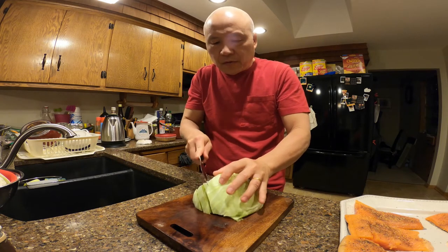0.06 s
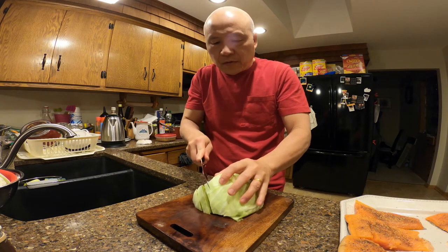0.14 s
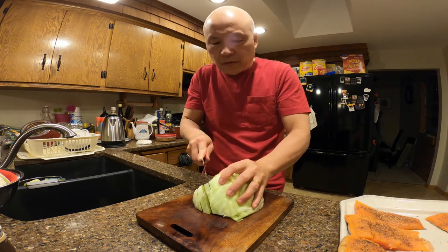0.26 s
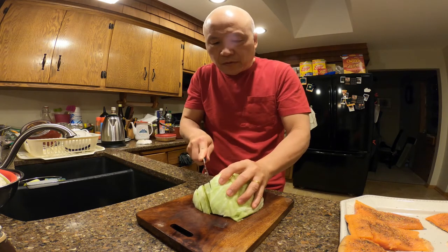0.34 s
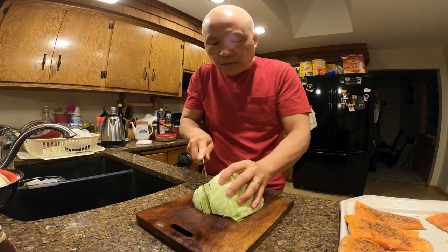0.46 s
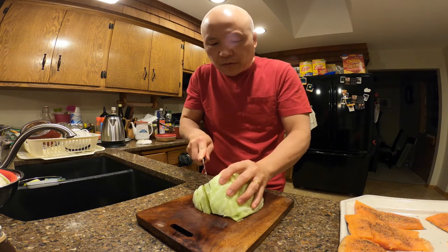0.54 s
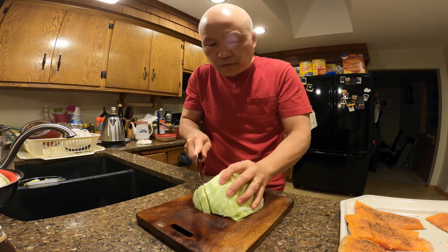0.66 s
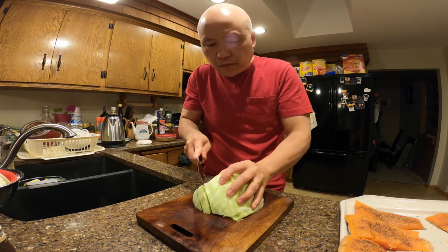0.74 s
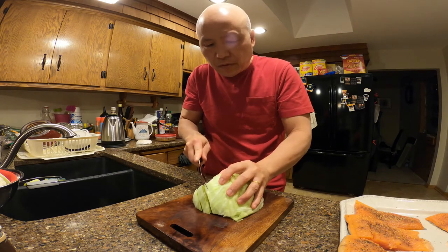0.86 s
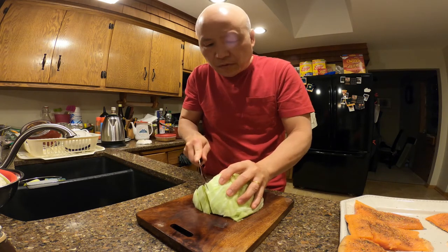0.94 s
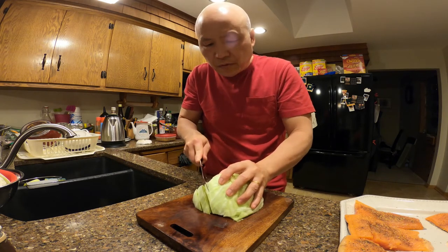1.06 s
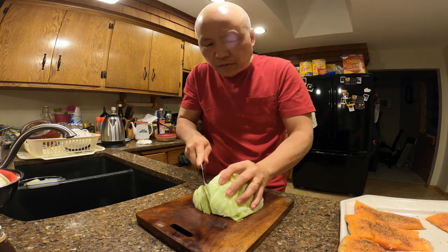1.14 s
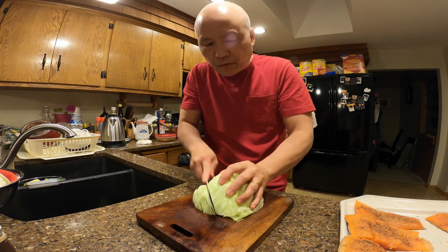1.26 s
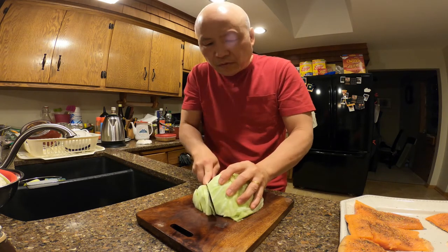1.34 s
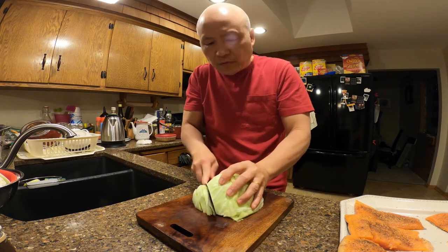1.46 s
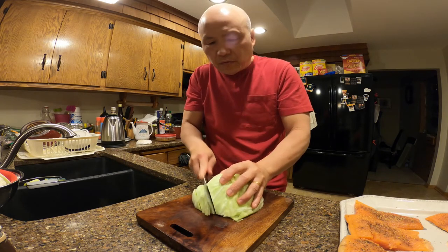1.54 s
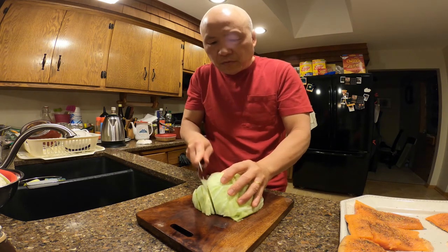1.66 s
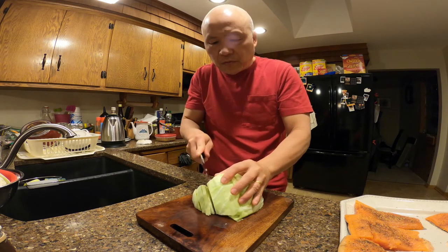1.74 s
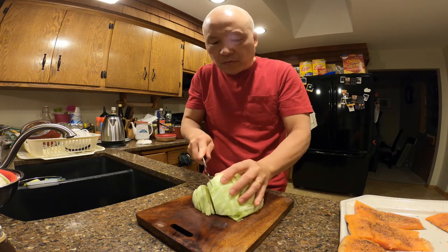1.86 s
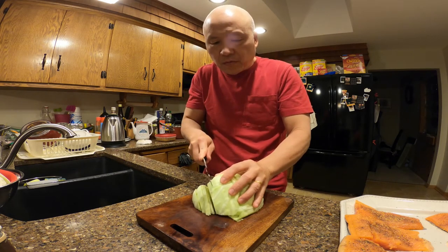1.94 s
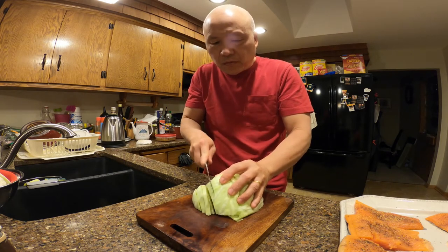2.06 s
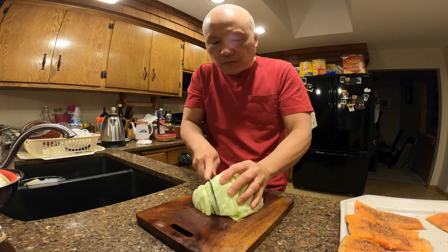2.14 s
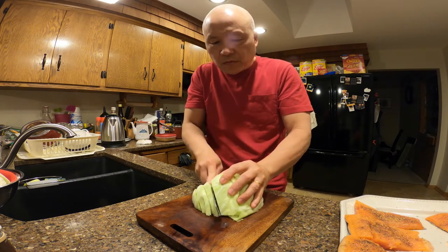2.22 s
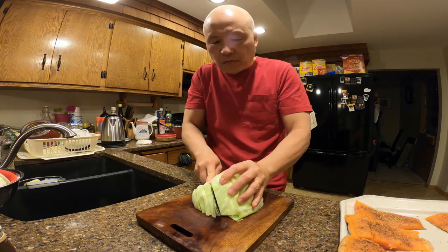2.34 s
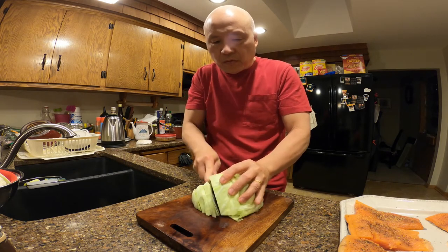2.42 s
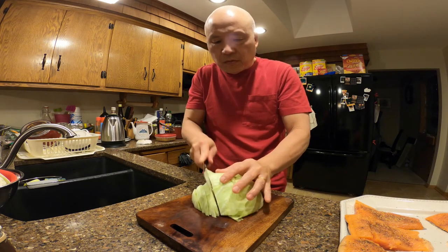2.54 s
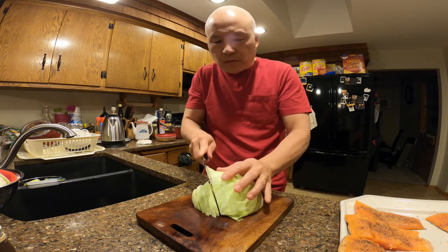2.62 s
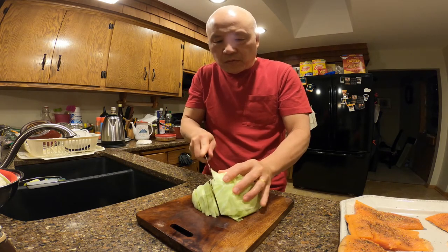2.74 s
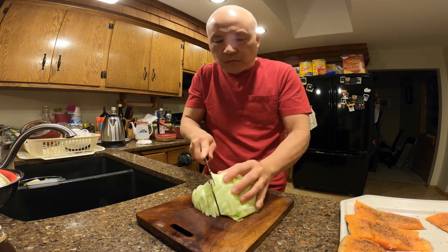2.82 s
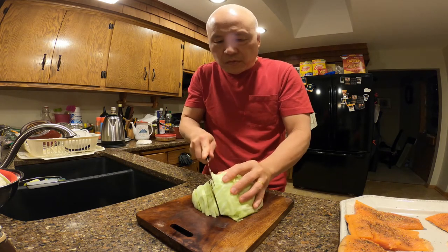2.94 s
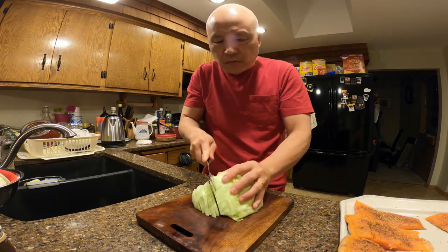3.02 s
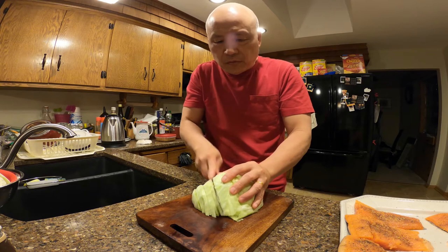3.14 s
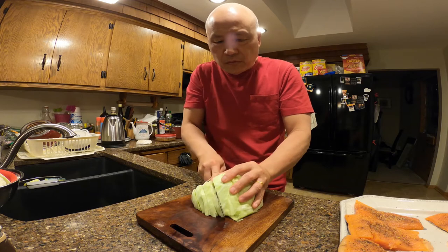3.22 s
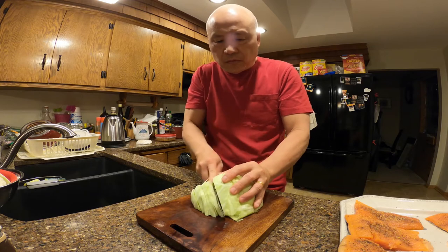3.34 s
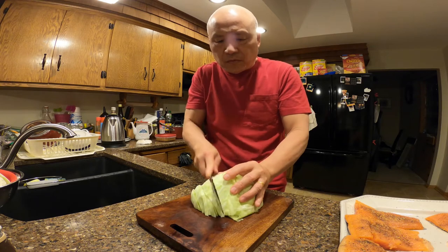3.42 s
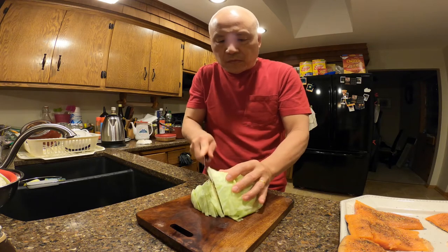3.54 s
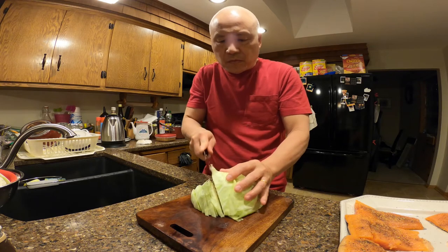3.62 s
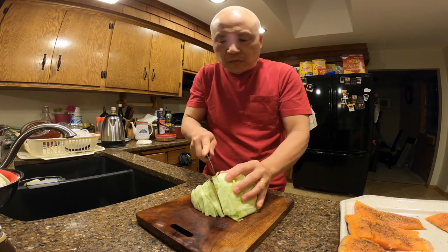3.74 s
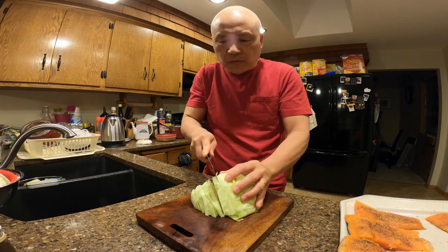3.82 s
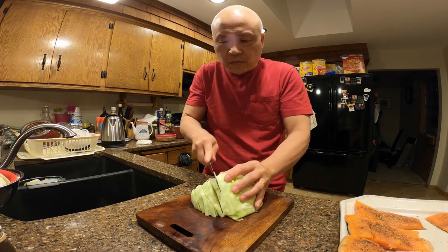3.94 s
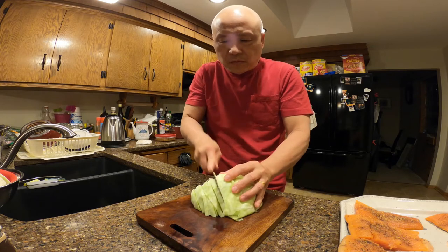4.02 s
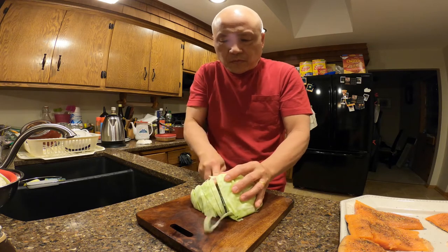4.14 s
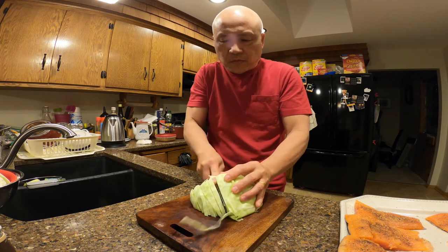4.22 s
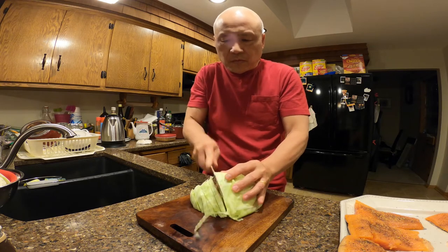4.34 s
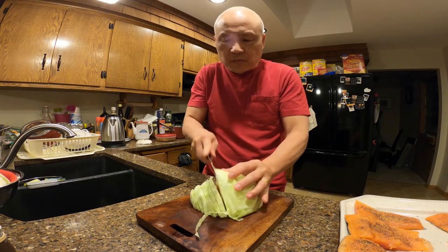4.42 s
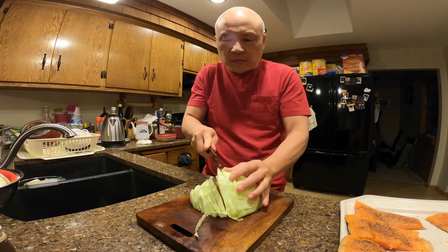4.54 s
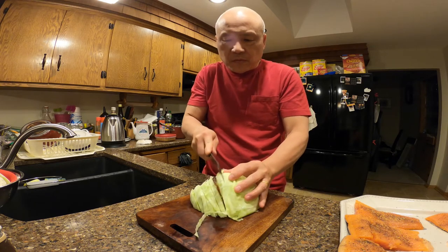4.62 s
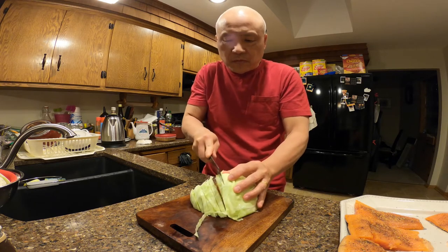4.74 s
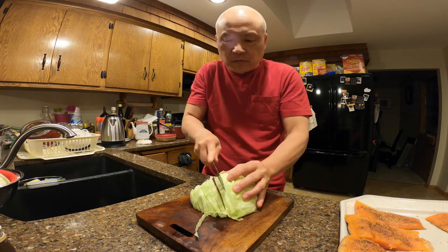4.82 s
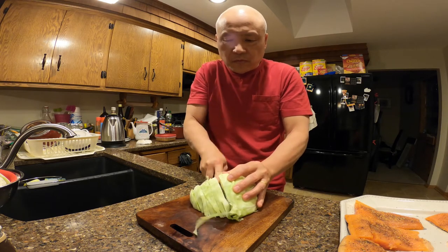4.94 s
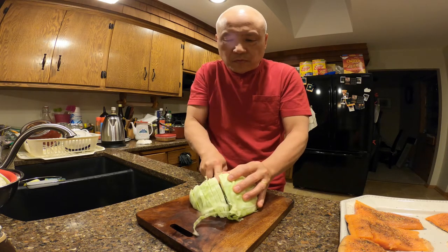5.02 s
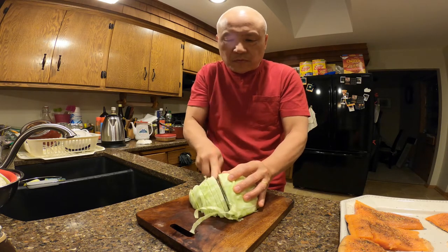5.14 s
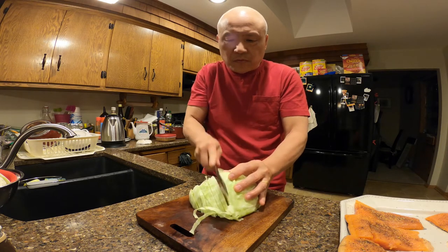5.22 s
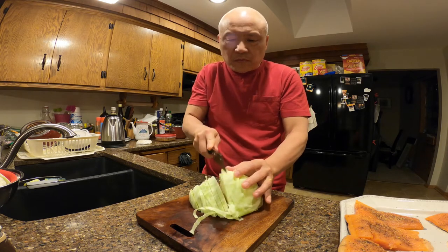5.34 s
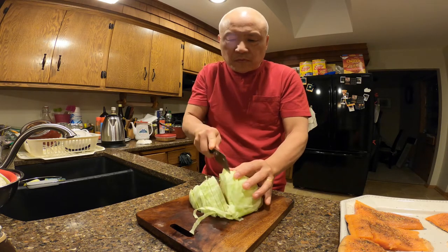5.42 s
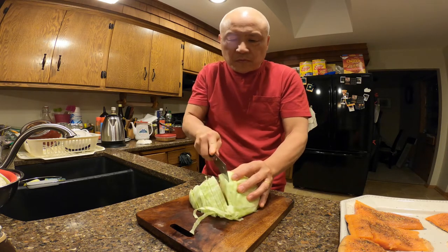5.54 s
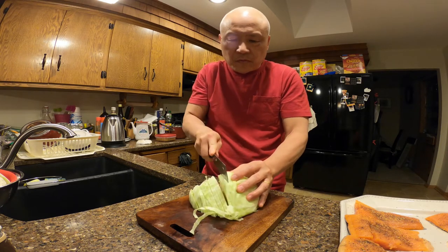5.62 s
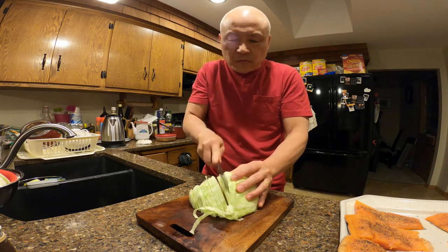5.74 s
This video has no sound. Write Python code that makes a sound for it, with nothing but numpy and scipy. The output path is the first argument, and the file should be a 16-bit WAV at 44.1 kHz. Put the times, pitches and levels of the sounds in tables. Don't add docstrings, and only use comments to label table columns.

```python
import sys
import numpy as np
from scipy import signal
from scipy.fft import rfft, irfft, next_fast_len
from scipy.io import wavfile
from scipy.ndimage import uniform_filter1d, map_coordinates

SR = 44100
rng = np.random.default_rng(int(sys.argv[2]) if len(sys.argv) > 2 else 0)


def field_ratio(decibels):
    return 10 ** (np.asarray(decibels, dtype=float) / 20)


def unload_audio(sound):
    columns = np.transpose(np.atleast_2d(sound))
    steps = np.round(np.clip(columns, -1, 1) * 32767)
    wavfile.write(sys.argv[1], SR, steps.astype(np.int16))


N = 254456


def unit(x):
    return x / np.sqrt(np.mean(x ** 2) + 1e-20)


def along(points, hz):
    f, v = np.transpose(points)
    return np.interp(np.log(hz + 1), np.log(f + 1), v)


def wobble(rate):
    knots = rng.standard_normal(int(N * rate / SR) + 4)
    return map_coordinates(knots, [np.arange(N) * rate / SR])


def filtered(x, response):
    m = 2 * next_fast_len(N // 2 + SR // 4)
    return irfft(rfft(x, m) * response(np.fft.rfftfreq(m, 1 / SR)), m)[..., :N]


def resonances(modes):
    def response(f):
        total = 0
        for k, (centre, width, db) in enumerate(modes):
            damping = 1j * f * width
            total = total + (-1) ** k * field_ratio(db) * damping / (centre * centre - f * f + damping)
        return total
    return response


def causal(spectrum):
    def response(hz):
        cepstrum = irfft(np.log(field_ratio(along(spectrum, hz)) + 1e-5))
        cepstrum[1:len(hz) - 1] *= 2
        cepstrum[len(hz):] = 0
        return np.exp(rfft(cepstrum))
    return response


def pair(two, alike):
    turn = lambda hz: np.arccos(np.clip(along(alike, hz), -1, 1)) / 2
    mid, side = filtered(two, lambda hz: np.array([np.cos(turn(hz)), np.sin(turn(hz))]))
    return np.array([mid + side, mid - side])


# frequency in Hz, density in dB per Hz.
AIR = [(20, -16), (59, -22), (100, -15), (129, -5.5), (259, -4.5), (288, -8), (420, -7.5), (520, -18),
       (810, -23), (1260, -21.5), (4030, -37), (7000, -39.5), (9000, -42.5), (11000, -44.5), (15600, -51.5)]
# frequency in Hz, left-right likeness from 0 to 1.
AIR_ALIKE = [(60, 0.27), (240, 0.1), (950, 0.11), (3770, 0.19), (15000, 0.09)]


def air():
    air_db, whine_hz, whine_db = -64.5, 9195, -94
    hiss = filtered(rng.standard_normal((2, N)), lambda hz: field_ratio(along(AIR, hz)))
    whine = field_ratio(whine_db + 1.5 * wobble(6)) * np.sin(2 * np.pi * whine_hz * np.arange(N) / SR)
    return field_ratio(air_db + 0.7 * wobble(5.3)) * unit(pair(hiss, AIR_ALIKE)) + whine


# first bite in seconds, full force in
# seconds, crunch at full force in dB, fleshy part in dB, treble in dB.
CUTS = [
    (1.23, 1.28, -35, -0.5, 0),
    (2.142, 2.203, -28, -1.5, -1.8),
    (3.118, 3.141, -34, 0.5, -0.9),
    (4.04, 4.078, -31, 1.5, -0.6),
    (4.889, 4.935, -32, 0.5, 0),
]
# push while cutting in dB, board rocking after the landing
# in dB, cabinet sway in dB.
SHAKES = [
    (-37.5, -46.5, -2.5),
    (-35.5, -32, -1.5),
    (-36.5, -30, -1),
    (-37, -26.5, 2.5),
    (-38.5, -33.5, 0.5),
]
# time in seconds, crunch in dB.
LAYER_FORCES = [
    [(1.23, -61), (1.24, -42), (1.256, -46), (1.262, -43), (1.294, -35), (1.348, -34.5), (1.36, -32),
     (1.43, -35)],
    [(2.145, -50.5), (2.159, -40), (2.171, -45), (2.181, -36), (2.209, -30), (2.341, -36), (2.345, -39.5)],
    [(3.122, -61), (3.13, -43.5), (3.144, -33.5), (3.162, -42.5), (3.194, -32), (3.202, -38),
     (3.232, -33.5), (3.324, -39), (3.33, -32.5)],
    [(4.04, -58), (4.048, -45), (4.084, -31), (4.158, -39.5), (4.196, -34), (4.218, -35), (4.222, -34)],
    [(4.895, -53), (4.919, -44.5), (4.924, -37.5), (4.939, -31.5), (4.985, -36), (4.999, -32.5),
     (5.017, -38.5), (5.039, -30.5), (5.067, -35.5), (5.074, -31)],
]
# start in seconds, length in seconds, level in dB,
# fleshy part in dB.
RUSTLES = [(0.0, 0.018, -59.5, -4.5), (0.292, .04, -77, 1), (0.545, .06, -78, -24), (.71, .03, -84, -1),
           (0.967, .04, -78, -8), (1.197, .012, -62, -11), (1.441, .05, -55.5, -3), (1.645, .03, -55, 2.5),
           (1.719, .05, -61.5, -13), (1.793, .045, -70, -1), (2.003, 0.018, -67, -8), (2.12, .01, -58, -10),
           (2.493, 0.097, -60.5, -0.5), (2.604, 0.082, -56, -3.5), (2.938, 0.016, -64, 0),
           (3.457, 0.11, -56.5, 1), (3.611, 0.1, -55.5, -2), (3.91, .02, -71, -4), (4.332, .16, -63, -2),
           (4.497, 0.1, -67.5, -3.5), (4.784, 0.006, -63, -5.5), (4.8, .01, -66, -5),
           (4.82, 0.049, -72.5, -10), (5.33, 0.04, -58.5, -2.5), (5.395, 0.049, -65, -3.5),
           (5.637, .02, -63, 3), (5.52, .02, -76, 0), (5.685, .08, -82, -1), (5.239, .07, -66.5, 0)]


def effort_curves():
    bite_flesh_db, top_flesh_db, core_flesh_db = -2, -3, -1
    parted_db_per_s = 1500.5
    rock_rise_s, rock_db_per_s = 0.028, 186.5
    rustle_rise_db_per_s, rustle_fall_db_per_s, rustle_shake_db = 3000, 284.5, -6.5
    t = np.arange(0, N + 32, 32) / SR
    crunch, flesh, shake, light, sway, top = np.full((6, len(t)), 1e-6)
    for cut, (push_db, rock_db, sway_db), layers in zip(CUTS, SHAKES, LAYER_FORCES):
        bite, full, full_db, flesh_db, top_db = cut
        land = min(blow[0] for blow in BLOWS if blow[0] > full)
        after = np.maximum(t - land, 0)
        force = field_ratio(np.interp(t, *np.transpose(layers)) + 0.5 - full_db) * (t > bite)
        sound = field_ratio(full_db) * force * field_ratio(-parted_db_per_s * after)
        depth_db = np.interp(t, [bite, full, land], [bite_flesh_db, top_flesh_db, core_flesh_db])
        crunch = crunch + sound
        flesh = flesh + sound * field_ratio(flesh_db + depth_db)
        top = top + sound * field_ratio(top_db)
        rock_fall = field_ratio(rock_db - rock_db_per_s * np.maximum(after - rock_rise_s, 0))
        moving = field_ratio(push_db) * force * (t < land) + np.minimum(after / rock_rise_s, 1) * rock_fall
        shake = shake + moving
        sway = sway + field_ratio(sway_db) * moving
    for s, length, db, flesh_db in RUSTLES:
        rise_db = -rustle_rise_db_per_s * np.maximum(s - t, 0)
        fall_db = -rustle_fall_db_per_s * np.maximum(t - s - length, 0)
        sound = field_ratio(db + rise_db + fall_db)
        crunch, top = crunch + sound, top + sound
        flesh = flesh + sound * field_ratio(flesh_db)
        light = light + sound * field_ratio(rustle_shake_db)
    shake = shake + light
    curves = (crunch, flesh, shake, sway, top)
    crunch, flesh, shake, sway, top = [np.interp(np.arange(N) / SR, t, c) for c in curves]
    sway = sway * field_ratio(-7.5 + 1.5 * wobble(14)) + field_ratio(-77 + 3 * wobble(27))
    return 20 * np.log10([crunch, flesh / crunch, shake, sway, top / crunch])


def ruptures(density, spread_db, spectrum):
    bursts = rng.random(N) < density / SR
    sizes = bursts * field_ratio(spread_db * np.clip(rng.exponential(size=N), 0, 4.5)) / np.sqrt(density)
    return unit(filtered(sizes * rng.standard_normal((2, N)), lambda hz: field_ratio(along(spectrum, hz))))


def patchy(x, depth_db):
    z = signal.stft(x, nperseg=128)[2]
    field = uniform_filter1d(rng.standard_normal(z.shape[1:]), size=4, axis=0)
    field = uniform_filter1d(field, size=3, axis=1)
    return unit(signal.istft(z * field_ratio(depth_db * unit(field)), nperseg=128)[1][:, :N])


HEAVY_HZ = 1500


def shaken(level_db, modes):
    body = lambda hz: resonances(modes)(hz) / (1 + 1j * hz / HEAVY_HZ) ** 2
    gain = np.std(filtered(rng.standard_normal(N), body))
    return filtered(field_ratio(level_db + 2.3 * wobble(30)) * rng.standard_normal(N), body) / gain


# frequency in Hz, density in dB per Hz.
CRISP = [(1180, -19.5), (2000, -15), (2540, -6), (3560, -3.5), (4520, -6.5), (7450, -10.5), (8180, -12),
         (9070, -12.5), (11900, -22.5), (14600, -31), (15600, -35)]
# frequency in Hz, density in dB per Hz.
FLESH = [(250, -28.5), (450, -14), (640, -0.5), (1150, -2), (1500, 1), (2000, -2.5), (3000, -24),
         (4500, -37.5)]
# frequency in Hz, width in Hz, level in dB.
COUNTER = [(136.1, 12, 1), (200.3, 6.5, 0), (299, 49, -13.5)]
# frequency in Hz, width in Hz, level in dB.
CABINET = [(66.74, 46, -10.5), (32, 9.5, -27)]


def cutting():
    crunch_db, flesh_db, shake_db, sway_db, top_db = effort_curves()
    effort = np.clip(field_ratio(crunch_db + 41.0), 0, 1)
    layers_db = 1.1 * wobble(45) + 1.4 * wobble(170) + 2.2 * (1 - effort) * wobble(70)
    crisp = ruptures(3000 + 9000 * effort, 0.67 + 0.8 * effort, CRISP)
    crisp = patchy(crisp, depth_db=3.0) * field_ratio(layers_db - 0.5)
    dull = filtered(crisp, lambda hz: 1 / (1 + (hz / 5000) ** 4))
    crisp = dull + (0.39 + 0.19 * effort) * field_ratio(top_db) * (crisp - dull)
    flesh = patchy(ruptures(1500 + 5000 * effort, 2.1, FLESH), depth_db=2.0)
    flesh = flesh * field_ratio(layers_db + flesh_db - 3.0)
    sway_hz = CABINET[0][0] * (1 + 0.15 * wobble(20))
    sway = field_ratio(sway_db + 3.5 + 2.4 * wobble(25)) * np.sin(2 * np.pi * np.cumsum(sway_hz) / SR)
    shake = shaken(shake_db - 0.5, COUNTER) + sway + shaken(sway_db - 10.5, CABINET)
    return field_ratio(crunch_db) * (crisp + flesh), shake


# start in seconds, peak in dB, pitch in Hz.
TICKS = [(1.565, -49, 4000), (2.5, -49.5, 4500), (2.523, -49, 5500), (2.555, -47, 4000), (2.562, -43, 5000),
         (2.577, -48, 2500), (2.668, -51, 4500), (2.677, -41, 3990), (.008, -56, 4100),
         (.0174, -42.5, 6300), (.0428, -47, 1970), (.1411, -53, 4600), (.2927, -49, 4040),
         (.3122, -53, 4050), (.3661, -65, 4470), (.5501, -49, 3500), (.5606, -41.5, 5940),
         (.605, -46, 5030), (.615, -53, 4000), (.644, -60, 4500), (.7093, -52, 5900), (.7186, -58, 5000),
         (.9343, -47, 1720), (1.0824, -56, 5000), (1.1139, -51.5, 2800), (1.66, -54, 9800),
         (1.866, -57.5, 4200), (2.138, -45.5, 4020), (2.9222, -48, 3560), (3.1104, -48, 1990),
         (3.91, -43.5, 6160), (4.365, -46, 4020), (4.465, -60, 4000), (4.518, -52.5, 4000),
         (4.617, -50, 4960), (4.8204, -54.5, 1460), (4.8808, -35.5, 5550), (4.89, -32, 2510),
         (5.318, -47.5, 2565), (5.35, -45, 4900), (5.522, -56, 2505), (5.575, -60, 9000), (.0, -56, 6000),
         (5.592, -49, 4500), (5.764, -49, 4020)]
# start in seconds, peak in dB, pitch in Hz.
TOUCHES = [(.282, -64, 5000), (.567, -50.5, 7000), (.7, -66, 7000), (.99, -51, 7980), (1.5, -43.5, 9440),
           (.9772, -50, 3012), (1.198, -43.5, 3134), (2.0073, -47, 3020), (2.1221, -43.5, 4340),
           (2.9438, -43.5, 3960), (4.0219, -32.5, 1884), (4.7837, -41.5, 3360), (5.6371, -40, 1432)]
# start in seconds, peak in dB, pitch in Hz.
PIPS = [(.722, -63, 6500), (.977, -58, 3000), (1.7255, -44, 3300), (1.7315, -42, 3500), (1.754, -51, 3100),
        (1.7655, -53, 3600), (1.798, -53, 2000), (1.82, -54, 2500), (1.8245, -45, 3800), (1.833, -53, 3200),
        (1.889, -55, 4100), (2.513, -54, 9200), (2.537, -51, 3000), (2.596, -54, 6200), (2.668, -49, 5900),
        (2.677, -50, 2000), (3.515, -50, 4700), (3.533, -51, 1500), (4.403, -56, 3000),
        (4.4785, -52, 12000), (4.5, -53, 3000), (4.842, -66, 9000), (4.891, -52, 9000),
        (4.9215, -35, 12000), (5.513, -59, 1700), (5.533, -63, 3000), (5.765, -56, 2800)]
# start in seconds, peak in dB, pitch in Hz.
SQUEAKS = [(.985, -71, 2950), (1.7245, -54.5, 3190), (1.745, -58.5, 3500), (1.77, -66.5, 3380),
           (1.795, -65.5, 3494)]
# start in seconds, peak in dB, pitch in Hz.
RIBS = [(1.2395, -29, 3604), (1.2616, -25, 3862), (1.2853, -20.5, 2740), (2.148, -33.5, 3900),
        (2.1822, -24.5, 3386), (3.1305, -30, 2640), (3.1416, -24.5, 2865), (3.1886, -30, 3423),
        (4.0478, -30.5, 1833), (4.0553, -31, 1883), (4.0817, -25, 2538), (2.1598, -35, 3950),
        (2.2117, -26, 3520), (4.9362, -21, 5835), (4.8992, -32, 3443), (4.9217, -24, 2720),
        (5.0356, -26, 2930), (1.2972, -24.5, 3430), (1.31, -22.5, 1893), (1.365, -28, 3516),
        (3.24, -29, 3483), (3.285, -30, 3207), (4.0758, -33, 3890), (4.9951, -27, 2080)]
# start in seconds, peak in dB, pitch in Hz, pitched part in dB.
SHREDS = [(4.0225, -47, 750, 8), (4.035, -46.5, 700, 8), (1.691, -52, 1485, 1), (1.6494, -40.5, 4540, -3),
          (1.654, -49.5, 920, 7.5), (1.725, -42.5, 3160, -5), (1.752, -45, 3540, -3.5),
          (1.5, -41.5, 8120, -3), (2.514, -47.5, 4760, -7.5), (2.602, -37.5, 2950, -1),
          (2.6842, -38, 4510, -6), (3.4785, -35.5, 4020, -9), (3.485, -44, 1110, 4),
          (3.5778, -37.5, 3775, -8.5), (3.5985, -41, 1320, 1), (3.638, -54, 950, -2),
          (3.6714, -50, 1138, 5.5), (3.686, -53, 1826, 13.5), (3.708, -39, 3015, -10),
          (3.813, -61, 5320, -4), (4.352, -45, 6170, -9), (4.4328, -42, 2200, 0.5),
          (4.4772, -38, 2680, -17.5), (4.487, -40, 7030, -20), (4.5269, -45, 4400, -11),
          (4.5674, -36, 3400, -14.5), (4.6099, -52, 1680, -0.5), (5.3353, -36, 1195, -23),
          (5.439, -37, 1110, -12)]
# frequency in Hz, density in dB per Hz.
RIB_CLICK = [(500, -39), (1200, -9), (3500, -10), (7500, -7.5), (8200, -6), (10000, -12.5), (13500, -17),
             (15600, -47)]


def snaps():
    # snaps, decay t60 in seconds, pitched part in dB, blur of the pitch, click top over its pitch.
    sorts = [(RIBS, 0.042, -10, 0.09, 7.3), (SHREDS, 0.016, 0, 0.11, 3), (TOUCHES, 0.053, -14, 0.12, 8.3),
             (TICKS, 0.012, -12.5, 0.2, 2.7), (SQUEAKS, 0.07, 3.9, 0.21, 1.3), (PIPS, 0.014, 1.5, 0.08, 1.8)]
    click, tone, t = np.zeros((2, N + SR)), np.zeros(N + SR), np.arange(SR // 5) / SR
    for table, t60, sort_tone_db, blur, top in sorts:
        decay = field_ratio(-60 * t / t60)
        fade = (1 - np.exp(-t / 0.00068)) * (field_ratio(-60 * t / 0.0022) + 0.56 * decay)
        for s, db, hz, *own_tone_db in table:
            at = round(s * SR)
            low_pass = signal.butter(2, min(top * hz, 20000), fs=SR)
            burst = signal.lfilter(*low_pass, fade * rng.standard_normal((2, len(t))))
            click[:, at:][:, :len(t)] += field_ratio(db + 6.5) * burst
            drift = blur * np.cumsum(rng.standard_normal(len(t)))
            tone_db = db + sort_tone_db + sum(own_tone_db)
            tone[at:][:len(t)] += field_ratio(tone_db) * decay * np.sin(2 * np.pi * hz * t + drift)
    return filtered(click[:, :N], causal(RIB_CLICK)) + tone[:N]


# start in seconds, level in dB.
THUMPS = [(.005, -63), (0.818, -59.5), (.97, -57.5), (1.081, -55), (1.66, -50.5), (2.03, -56), (2.82, -61),
          (3.66, -56), (5.299, -57), (5.46, -59.5), (2.62, -53.5), (2.954, -45.5), (3.03, -53),
          (3.617, -59), (3.924, -52.5), (4.6, -54.5), (4.795, -46.5), (5.652, -45.5), (5.701, -50)]


def thumps():
    push_s, cabinet_db = 0.0071, 10
    push, t = np.zeros(N + SR), np.arange(SR // 5) / SR
    soft = np.hanning(round(push_s * SR))
    for s, db in THUMPS:
        settling = field_ratio(-30.0 - 60 * t / 0.18) * rng.standard_normal(len(t))
        settling[0] = 1
        push[round(s * SR):][:len(t)] += field_ratio(db + 54.5) * np.convolve(settling, soft / soft.sum())[:len(t)]
    counter = filtered(push[:N], resonances(COUNTER))
    return counter + field_ratio(cabinet_db) * filtered(push[:N], resonances(CABINET))


# start in seconds, peak in dB, main mode in Hz, contact in
# milliseconds, ring in dB.
BLOWS = [(1.434, -7.5, 894, 0.084, -13.5), (1.462, -25, 900, .27, -8.5), (2.348, -6, 866, 0.06, -11),
         (2.379, -4, 930, .2, -16.5), (3.3329, -6.5, 853, 0.026, -5.5), (3.364, -8.5, 1020, 0.41, -7.5),
         (3.4, -21.5, 1032, 0.077, -3.5), (4.2261, -4.5, 1130, 0.039, -8), (4.262, -6.5, 1083, 0.17, -7.5),
         (4.297, -21.5, 1016, 0.27, -17), (5.078, -3.5, 1134, 0.035, -8), (5.118, -21, 1084, 0.24, 4),
         (5.146, -15.5, 1160, 0.16, -5.5)]
# frequency in Hz, width in Hz, level in dB.
BOARD = [(313, 130, -4.5), (621.4, 130, 2), (882, 42, 5), (1110, 40, 5.5), (1823, 69, 2), (2150, 33, -14.5),
         (2686, 95, 5.5), (4340, 300, -28.5)]
# frequency in Hz, density in dB per Hz.
SPLINTER = [(150, -28.5), (250, -12), (1020, -1.5), (2000, -7), (2790, 0.5), (3580, -26.5), (4360, -12.5),
            (5800, -26), (7000, -38.5), (9100, -71.5), (15400, -120)]
# frequency in Hz, density in dB per Hz.
RATTLE = [(150, -27), (250, -2), (519, -17.5), (816, -8.5), (1050, -0.5), (1470, -12.5), (2810, -12),
          (3900, -32.5), (6000, -33.5), (7800, -65), (13200, -120)]
# frequency in Hz, level in dB, decay t60 in seconds.
RING = [(327, -11.5, 0.23), (582.5, -4, 0.14), (744, -5, 0.19), (938, -9, 0.21), (1435, -22.5, 0.27),
        (1774, -10.5, 0.24), (2200, -21, 0.26), (2890, -18.5, 0.31), (2745, -14.5, 0.35), (2440, -16, 0.36),
        (855, -10, 0.27), (1870, -15, .35), (1348, -14, 0.25)]


def blows():
    slab_hz, slab_db, slab_t60_s = 1114, -4.5, 0.42
    slab_db_per_octave = 28.5
    spot_db_per_octave = 2.5
    slab_blur, board_blur = 0.03, 0.045
    thud_db, ring_top_hz = -11, 5000
    knock, thud, t = np.zeros(N), np.zeros(N), np.arange(SR // 2) / SR
    splinter, chatter, ring = np.zeros((3, N + SR))
    rise = 1 - np.exp(-t / 0.0014)
    noise = lambda: rng.standard_normal(len(t))
    for s, db, main_hz, contact_ms, ring_db in BLOWS:
        at = round((s + 0.0006) * SR)
        here = slice(at, at + len(t))
        if not any(0 < s - blow[0] < 0.1 for blow in BLOWS):
            parting = field_ratio(db - 17 - 60 * t / 0.008) * rise * np.sin(2 * np.pi * 4400 * t)
            ring[at - 150:][:len(t)] += parting
        u = t[:100] * 1000 / contact_ms
        pulse = u * np.exp(-u) / np.sum(u * np.exp(-u))
        knock[at:][:100] += field_ratio(db + 24.5) * pulse
        fibres = rise * field_ratio(db + 10.0 - 60 * t / 0.025) * noise()
        edge_crack = rise * field_ratio(db + 3.0 - 60 * t / 0.02) * noise()
        splinter[here] += np.convolve(fibres + edge_crack, pulse)[:len(t)]
        chatter[here] += rise * field_ratio(db + ring_db + 3.0 - 60 * t / 0.33) * noise()
        thud[at] += field_ratio(db + thud_db + 44.0)
        ring[here] += field_ratio(db - 12.0 - 60 * t / 0.038) * rise * np.sin(2 * np.pi * main_hz * t)
        woken_db = slab_db - slab_db_per_octave * abs(np.log2(main_hz / slab_hz))
        for hz, level, t60 in RING + [(main_hz, -7, 0.15), (slab_hz, woken_db, slab_t60_s)]:
            drift = np.cumsum(noise()) * (slab_blur if hz == slab_hz else board_blur)
            contact_db = -10 * np.log10(1 + (2 * np.pi * hz * contact_ms / 1000) ** 2)
            spot_db = -spot_db_per_octave * abs(np.log2(hz / main_hz)) + rng.normal(0, 1.9)
            mode_db = db + ring_db + level - 10.0 + contact_db + spot_db
            ring[here] += field_ratio(mode_db - 60 * t / t60) * rise * np.sin(2 * np.pi * hz * t + drift)
    wood = filtered(knock, resonances(BOARD)) + filtered(splinter[:N], causal(SPLINTER))
    wood = wood + filtered(chatter[:N], causal(RATTLE))
    wood = wood + filtered(ring[:N], lambda hz: 1 / (1 + (hz / ring_top_hz) ** 6))
    body = lambda hz: resonances(COUNTER + CABINET)(hz) / (1 + 1j * hz / HEAVY_HZ)
    return wood, filtered(thud, body)


# frequency in Hz, decay t60 in seconds.
KITCHEN = [(60, 0.17), (250, 0.19), (1000, 0.29), (3000, 0.4), (5000, 0.38), (7500, 0.46), (9500, 0.33),
           (11000, .28), (13000, 0.16)]


def kitchen(x):
    out, step = np.zeros((2, N + 2 * SR)), SR * 9 // 20
    for at in range(0, N, step):
        hz, t, z = signal.stft(rng.standard_normal((3, SR * 3 // 4)), SR, nperseg=256)
        dying = field_ratio(-60 * t / along(KITCHEN, hz)[:, None])
        tail = signal.istft(z * dying, SR, nperseg=256)[1]
        tail = 0.44 * tail[0] + tail[1:]
        wet = signal.fftconvolve(x[None, at:at + step], tail / np.linalg.norm(tail[0]), axes=1)
        out[:, at + 260:][:, :wet.shape[1]] += wet
    return out[:, :N]


# frequency in Hz, left-right likeness from 0 to 1.
LEAVES_ALIKE = [(1500, 1), (2500, 0.83), (4000, 0.8), (8000, 0.51), (12000, 0.34)]
# frequency in Hz, left minus right in dB.
LEAN = [(60, 4), (150, -1), (380, 1), (950, 1), (2380, 3.0), (5980, 2.5), (15000, -8)]
# frequency in Hz, lead of the left port in radians.
LEAD = [(30, -0.54), (200, 0.73), (400, -0.3), (780, 0.3), (1900, 0.72), (6120, -1.2), (8180, -2.02),
        (9400, -1.47)]


def scene():
    walls_top_hz, knock_spread_hz = 6540, 2400
    crunch, shake = cutting()
    leaves = pair(crunch + snaps(), LEAVES_ALIKE)
    knock, thud = blows()
    dulled = lambda x, top_hz: filtered(x, lambda hz: 1 / (1 + 1j * hz / top_hz) ** 2)
    to_walls = field_ratio(-8.5) * dulled(leaves[0], walls_top_hz) + field_ratio(-7.5) * dulled(knock, knock_spread_hz)
    walls = kitchen(to_walls + field_ratio(-10.5) * (thud + shake))
    side = np.array([[1], [-1]])
    ports = lambda hz: field_ratio(side * along(LEAN, hz) / 2) * np.exp(1j * side * along(LEAD, hz) / 2)
    return filtered(leaves + knock + thud + shake + thumps() + walls, ports) + air()


def top_cut(x):
    return signal.sosfilt(signal.butter(12, 15740, fs=SR, output="sos"), x)


def record(dry):
    port_hz, port_width_hz, port_depth, top_hz = 8200, 500, 0.66, 15500
    low_cut = lambda hz: (1j * hz / (1j * hz + 16)) ** 2
    notch = lambda hz: 1 - port_depth / (1 + ((hz - port_hz) / (port_width_hz / 2)) ** 2)
    heard = filtered(dry, lambda hz: low_cut(hz) * notch(hz) / (1 + (hz / top_hz) ** 60))
    heard = heard / (1 + np.abs(heard / 0.72) ** 4) ** (1 / 4)
    return top_cut(heard)


dry = scene()
out = record(dry)
unload_audio(out)
```